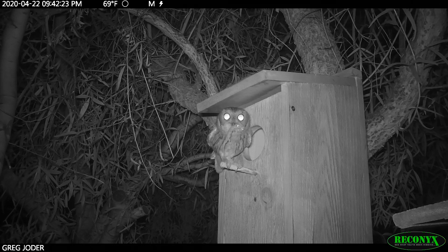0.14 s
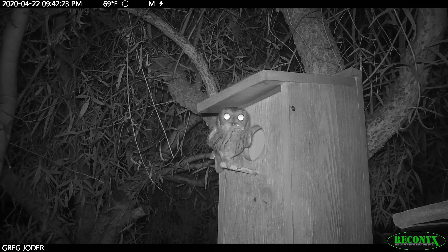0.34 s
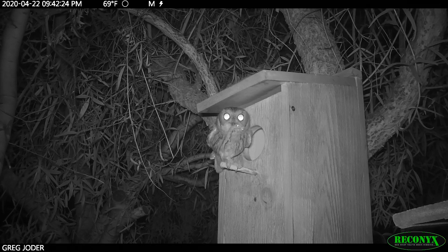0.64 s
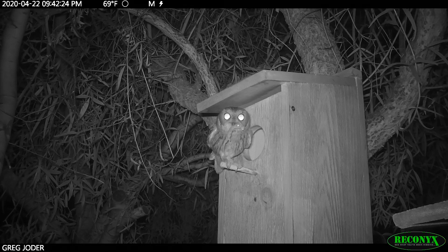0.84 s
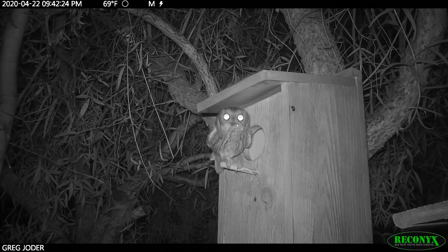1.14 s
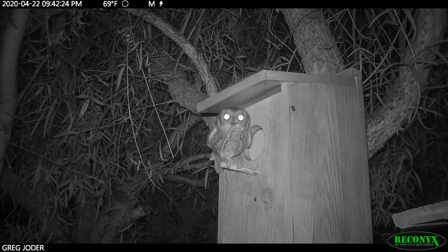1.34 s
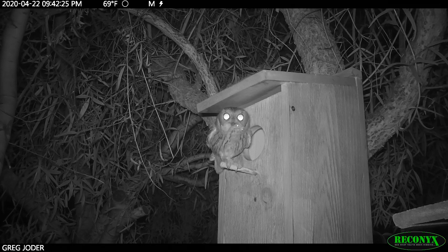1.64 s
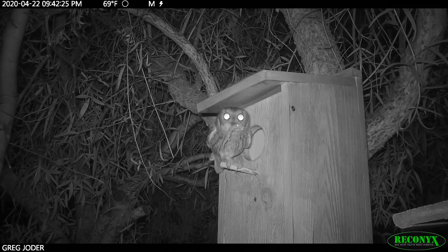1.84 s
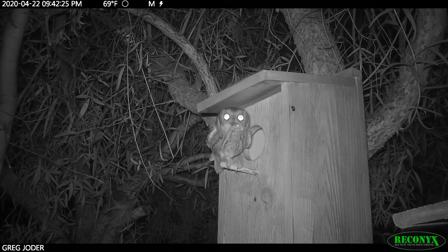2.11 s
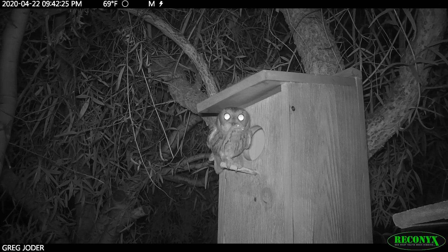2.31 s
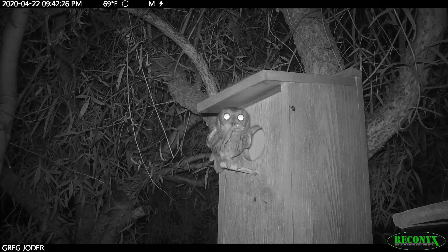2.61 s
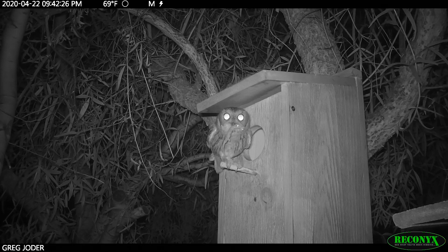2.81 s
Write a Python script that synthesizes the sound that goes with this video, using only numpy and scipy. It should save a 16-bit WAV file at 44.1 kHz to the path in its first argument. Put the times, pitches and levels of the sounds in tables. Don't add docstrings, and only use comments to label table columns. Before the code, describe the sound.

Fast pulsing cricket chirps with ticking insects, faint hiss and soft, low hoots from an owl

```python
import sys
import numpy as np
from scipy import signal
from scipy.fft import rfft, irfft
from scipy.io import wavfile

SR = 44100
rng = np.random.default_rng(int(sys.argv[2]) if len(sys.argv) > 2 else 0)


def voltage_ratio(decibels):
    exponent = np.asarray(decibels, float) / 20
    return 10 ** exponent


def wrap_up_sound(samples):
    columns = np.atleast_2d(samples).T
    tamed = np.clip(columns, -1, 1)
    steps = np.round(tamed * 32767).astype(np.int16)
    wavfile.write(sys.argv[1], SR, steps)


N = 130536


def unit(x):
    return x / np.sqrt(np.mean(x ** 2) + 1e-20)


def drift(rate_hz):
    r = np.exp(-80 * np.pi * rate_hz / SR)
    noise = rng.standard_normal(N // 40 + 2002)
    slow = signal.lfilter([1], [1, -2 * r, r * r], noise)[2000:]
    return np.interp(np.arange(N) / 40, np.arange(len(slow)), unit(slow))


def curve(rows):
    return np.interp(np.arange(N) / SR, *np.transpose(rows))


def bands(spectrum, low_hz, top_hz, shared_db, own_db, rate, count):
    hz = np.fft.rfftfreq(N, 1 / SR) + 1
    f, db = np.transpose(spectrum)
    colour = voltage_ratio(np.interp(np.log(hz), np.log(f), db, left=-90, right=-90))
    shaped = rfft(rng.standard_normal(N)) * colour
    place = count * np.log(hz / low_hz) / np.log(top_hz / low_hz)
    together = drift(rate / 4)
    total = 0
    for k in range(count + 1):
        band = irfft(shaped * np.clip(1 - abs(place - k), 0, 1), N)
        total = total + band * voltage_ratio(shared_db * together + own_db * drift(rate))
    return unit(total)


def ring(strikes, hz, t60):
    r, w = voltage_ratio(-60 / (t60 * SR)), 2 * np.pi * hz / SR
    return signal.lfilter([0, np.sin(w)], [1, -2 * r * np.cos(w), r * r], strikes + 1e-18)


def add(out, s, length, db, hz, rise, fall, octave_db=-80, notch=0):
    notch_hz, notch_width_hz = 6275, 45
    t = np.arange(int(length * SR)) / SR
    pitch = hz(t / length)
    edge = np.sin(np.pi / 2 * np.clip(np.minimum(t / rise, (length - t) / fall), 0, 1)) ** 2
    edge = edge * (1 - notch * np.exp(-((pitch - notch_hz) / notch_width_hz) ** 2))
    phase = 2 * np.pi * np.cumsum(pitch) / SR
    tone = np.sin(phase) + voltage_ratio(octave_db) * edge * np.sin(2 * phase)
    i = int(s * SR)
    out[i:i + len(t)] += voltage_ratio(db) * np.sqrt(2) * edge * tone


def scattered(x, db, t60):
    t = np.arange(SR // 4) / SR
    tail = rng.standard_normal(len(t)) * voltage_ratio(-60 * t / t60) * (t > .009)
    return x + voltage_ratio(db) * signal.fftconvolve(x, tail / np.linalg.norm(tail))[:len(x)]


# f/Hz, level/dB
CHORUS_COLOUR = [(2820, -49), (4600, -53), (5250, -15), (5930, 4.5), (6280, 1), (7450, -10.5), (8330, -28),
                 (9500, -23), (12400, -24), (20900, -120)]
# t/s, level/dB
CHORUS_SWELL = [
    (0.0, -58),
    (0.41, -53.5),
    (0.81, -58),
    (1.27, -55.5),
    (1.56, -55),
    (1.94, -57.5),
    (2.25, -55),
    (2.36, -60.5),
    (2.62, -54),
    (2.96, -54.5),
]


def chorus():
    shimmer_db, strokes_db, strokes_per_s, ring_s = -60, -67, 500, .0045
    vigour = curve(CHORUS_SWELL) - np.mean(curve(CHORUS_SWELL))
    sizes = voltage_ratio(4 * np.minimum(rng.exponential(1, N), 3))
    sizes = sizes * (rng.random(N) < strokes_per_s * voltage_ratio(3 * drift(14)) / SR)
    singer = rng.integers(0, 16, N)
    strokes = 0
    for k, hz in enumerate(np.geomspace(4900, 9000, 16)):
        song = ring(ring(sizes * (singer == k), hz, ring_s), hz, ring_s)
        strokes = strokes + voltage_ratio(-16 * abs(np.log2(hz / 6500))) * song
    shimmer = bands(CHORUS_COLOUR, 4460, 11400, shared_db=2, own_db=2.6, rate=70, count=8)
    return voltage_ratio(strokes_db + 1.5 * vigour) * unit(strokes) + voltage_ratio(shimmer_db + .5 * vigour) * shimmer


# f/Hz, level/dB
AIR_COLOUR = [(22, -3), (42, -1.5), (65, -6.5), (95, -6), (145, -11.5), (185, -10.5), (280, -21),
              (900, -26.5), (3000, -31.5), (15000, -37.5)]


def air_noise():
    colour = AIR_COLOUR + [(16000, AIR_COLOUR[-1][1])]
    return voltage_ratio(-52.5) * bands(colour, 20, 16000, shared_db=.4, own_db=.8, rate=12, count=14)


# t/s, level/dB
ROAD_LEVEL = [
    (0.0, -60.5),
    (0.72, -60),
    (1.12, -63),
    (2.18, -63.5),
    (2.37, -64),
    (2.96, -62.5),
]
# f/Hz, level/dB
ROAD_COLOUR = [(250, -4.5), (700, -5), (1000, -7), (2200, -17)]


def road():
    return voltage_ratio(curve(ROAD_LEVEL)) * bands(ROAD_COLOUR, 250, 2200, shared_db=.6, own_db=2, rate=12, count=6)


# multiple of firing rate, level/dB
MOTOR_TONES = [(1, -58), (2, -61), (3, -61), (4, -62), (6, -73), (7, -78.5)]


def motor():
    firing_hz, waver_hz = 40.83, 6.7
    r = np.exp(-np.pi * waver_hz / SR)
    out = 0
    for k, db in MOTOR_TONES:
        a = [1, -2 * r * np.cos(2 * np.pi * k * firing_hz / SR), r * r]
        noise = rng.standard_normal(N + SR)
        tone = signal.lfilter([1], a, signal.lfilter([1, 0, -1], a, noise))[SR:]
        out = out + voltage_ratio(db) * unit(tone)
    return out


# f/Hz, level/dB
WHINE_TONES = [(9800, -87), (9860, -87)]


def whine():
    t = np.arange(N) / SR
    return sum(voltage_ratio(db + 2 + 2 * drift(3)) * np.sin(2 * np.pi * hz * t) for hz, db in WHINE_TONES)


# t/s, level/dB
RUSTLE_LEVEL = [(0, -82), (.085, -56), (.2, -70), (.4, -69), (.55, -72), (.66, -76), (.9, -72), (1.1, -69),
                (1.3, -61.5), (1.45, -74), (1.62, -67), (1.8, -59), (2, -68), (2.2, -68), (2.5, -68),
                (2.65, -67), (2.8, -76), (2.96, -69)]
# f/Hz, level/dB
RUSTLE_COLOUR = [(6300, 4), (7300, 3), (8300, -4), (10500, -10.5)]


def leaves():
    return voltage_ratio(curve(RUSTLE_LEVEL)) * bands(RUSTLE_COLOUR, 6300, 12000, shared_db=4, own_db=-.5, rate=60, count=5)


# t/s, peak level/dB, f/Hz
MAIN_TICKS = [(0.0034, -47, 7050), (0.08, -40.5, 7100), (0.0864, -41.5, 7730), (0.1795, -47, 7100),
              (0.3343, -44.5, 6800), (0.4594, -44, 7260), (0.5948, -43, 7100), (0.7911, -65, 6860),
              (1.118, -46, 7060), (1.2336, -47, 6900), (1.3554, -43.5, 6850), (1.4875, -53, 6890),
              (1.614, -49, 7310), (1.7254, -47, 7200), (1.787, -68, 6900), (1.8823, -42, 7500),
              (1.9115, -54, 7200), (1.944, -52, 6840), (2.0323, -45.5, 7200), (2.4184, -46, 7060),
              (2.4877, -45, 7150), (2.539, -47.5, 7040), (2.7137, -48, 7100), (2.7944, -50, 7240),
              (2.9053, -47, 7240)]
# t/s, peak level/dB, f/Hz
LOWER_TICKS = [
    (0.1411, -53, 5000),
    (0.295, -48.5, 5300),
    (1.848, -50, 5070),
    (2.137, -51, 5080),
    (2.225, -54, 4900),
    (2.487, -55, 5240),
]
# t/s, peak level/dB, f/Hz
HIGHER_TICKS = [(0.454, -56, 8300), (.6429, -55, 7750), (.6629, -49, 7530), (.839, -47, 7030),
                (1.0465, -57, 8750), (1.245, -59, 8600), (1.3194, -52, 8450), (1.3733, -55, 8300),
                (1.9435, -53, 8500), (1.984, -55, 9000), (2.505, -54, 9000), (2.6065, -46, 7010)]


def ticks():
    tick_s, glide_hz = .0018, 1500
    out = np.zeros(N + SR)
    for s, db, hz in MAIN_TICKS + LOWER_TICKS + HIGHER_TICKS:
        add(out, s + .00036, tick_s, db, lambda u: .948 * hz + glide_hz * (.5 - u),
            rise=.2 * tick_s, fall=.9 * tick_s)
    return scattered(out[:N], -2, t60=.04)


# closing stroke t/s, lead of opening stroke/s, opening level/dB, closing level/dB
CRICKET_CHIRPS = [(0.1142, 0.0234, -45.1, -42.8), (0.256, 0.0241, -46.0, -43.8),
                  (0.4021, 0.0241, -45.9, -43.5), (0.5602, 0.0239, -45.4, -43.1),
                  (0.7068, 0.0241, -46.9, -43.1), (0.8537, 0.0249, -46.9, -43.2),
                  (0.9995, 0.024, -46.4, -43.3), (1.1504, 0.0243, -45.9, -42.8),
                  (1.2963, 0.0241, -46.8, -43.1), (1.4458, 0.0234, -46.2, -44.6),
                  (1.5905, 0.0245, -45.8, -42.5), (1.7311, 0.0241, -47.3, -43.3),
                  (1.8762, 0.0239, -45.8, -42.9), (2.0171, 0.0238, -45.8, -43.1),
                  (2.1718, 0.0307, -46.7, -46.5), (2.3227, 0.0227, -45.7, -44.7),
                  (2.4716, 0.0231, -46.7, -43.3), (2.6168, 0.0242, -44.9, -43.0),
                  (2.7591, 0.0248, -46.0, -42.9), (2.9076, 0.0241, -45.6, -43.1)]


def cricket():
    open_s, close_s, hesitant_lead_s = .0098, .0112, .028
    open_hz, close_hz, end_hz = 6640, 6690, 5950
    open_rise_s, close_rise_s, fall_s, open_early_s = .0045, .0012, .0012, .0013
    stroke_db, notch_depth = -1.5, .85
    out = np.zeros(N + SR)
    tunings = 1 + .003 * rng.standard_normal((len(CRICKET_CHIRPS), 2))
    for (s, lead, open_db, close_db), (open_tune, close_tune) in zip(CRICKET_CHIRPS, tunings):
        add(out, s - lead - open_early_s, open_s, open_db + stroke_db,
            lambda u: open_tune * (open_hz + (end_hz - open_hz) * u),
            open_rise_s, fall_s, notch=.6 * notch_depth)
        late = lead > hesitant_lead_s
        top_hz = open_hz if late else close_hz
        add(out, s - late * .003, open_s if late else close_s, close_db + stroke_db,
            lambda u: close_tune * (top_hz + (end_hz - top_hz) * u),
            close_rise_s, fall_s, notch=notch_depth)
    return scattered(out[:N], -15, t60=.12)


# delay t/s, level/dB
CALL_ECHOES = [
    (.034, -15),
    (.056, -21),
]


def across_scrub(calls):
    calls[:N] *= voltage_ratio(.4 * drift(45))
    echoes = sum(voltage_ratio(db) * np.roll(calls, int(s * SR)) for s, db in CALL_ECHOES)
    return scattered(calls + echoes, -17, t60=.2)[:N]


# t/s, length/s, level/dB, top f/Hz, place of the top 0-1
YIP_CALLS = [(0.114, 0.041, -61.5, 939, 1), (0.809, 0.044, -60, 802, 1), (.89, 0.028, -57, 779, 0.66),
             (1.03, 0.029, -60.5, 830, 0.3), (1.391, 0.028, -61.5, 712, 0.76),
             (1.46, 0.039, -58, 819, 0.98), (1.759, 0.022, -57.5, 803, 0.75),
             (1.893, 0.087, -58.5, 892, 0.45), (2.028, 0.073, -56, 758, 0.67), (2.149, .13, -58, 768, 0.52),
             (2.461, 0.0193, -57, 688, 0.2), (1.557, 0.014, -60, 884, 0.8), (1.558, 0.044, -67, 1420, 0.6),
             (1.26, 0.021, -65, 950, 0.85), (.4, 0.027, -63, 844, 0.58), (.55, 0.035, -64.5, 796, .4),
             (0.632, 0.031, -62, 966, 0.76), (1.821, 0.029, -63, 857, 0.7)]


def yips():
    bend_hz_per_s2 = 54100
    out = np.zeros(N + SR)
    for s, length, db, top_hz, place in YIP_CALLS:
        bend = bend_hz_per_s2 * (.0802 / length) ** .59
        add(out, s, length, db, lambda u: top_hz - bend * (length * (u - place)) ** 2,
            rise=.26 * length, fall=.071 * length)
    return across_scrub(out)


# t/s, length/s, level/dB, first f/Hz, last f/Hz
OWL_TOOTS = [(0.327, 0.068, -48, 533, 489), (0.711, 0.062, -45, 557, 508), (0.783, 0.064, -44.5, 511, 563),
             (0.913, 0.029, -51, 567, 520), (1.005, 0.041, -48, 568, 503), (1.348, 0.059, -46, 563, 523),
             (1.497, 0.061, -44.5, 588, 530), (1.812, 0.072, -44.5, 559.5, 530),
             (1.905, 0.056, -45.5, 538, 522), (2.036, 0.044, -53, 608, 620),
             (2.244, 0.061, -42.5, 565, 526), (2.344, 0.068, -43.5, 542, 550),
             (2.672, 0.065, -42.5, 542.5, 533), (2.847, 0.07, -43, 535, 536)]


def owl():
    onset_hz, onset_s = 80, .016
    out = np.zeros(N + SR)
    wobble = 1 + .003 * drift(46)
    for s, length, db, first_hz, last_hz in OWL_TOOTS:
        def pitch(u):
            glide = first_hz + (last_hz - first_hz) * u
            sharp_start = onset_hz * np.exp(-u * length / onset_s)
            return wobble[int(s * SR):][:len(u)] * (glide + sharp_start)
        add(out, s, length, db, pitch, rise=.026, fall=.014, octave_db=-25)
    return across_scrub(out)


# t/s, peak level/dB
TWIG_SNAPS = [
    (.5952, -50.0),
    (1.1298, -52.0),
    (2.0330, -46.0),
    (2.4813, -48.0),
]


def twigs():
    s, db = np.transpose(TWIG_SNAPS)
    clicks = np.zeros(N)
    clicks[(s * SR).astype(int)] = voltage_ratio(db)
    wood = signal.butter(2, [1200, 5000], "band", fs=SR, output="sos")
    return scattered(signal.sosfilt(wood, 7.1 * clicks + 1e-18), -2, t60=.04)


def scene():
    background = chorus() + air_noise() + road() + motor() + whine() + leaves()
    return (background + ticks() + cricket() + yips() + owl() + twigs())[None]


def top_cut(x):
    return signal.sosfilt(signal.butter(12, 15310, fs=SR, output="sos"), x)


def record(dry):
    cutoff_hz, offset_start, offset_end, settle_s = 15400, .07, -.03, 1.1
    cut = signal.sosfilt(signal.cheby2(22, 60, cutoff_hz, fs=SR, output="sos"), dry)
    offset = offset_end + offset_start * np.exp(-np.arange(N) / SR / settle_s)
    return top_cut(cut + offset)


dry = scene()
out = record(dry)
wrap_up_sound(out)
```